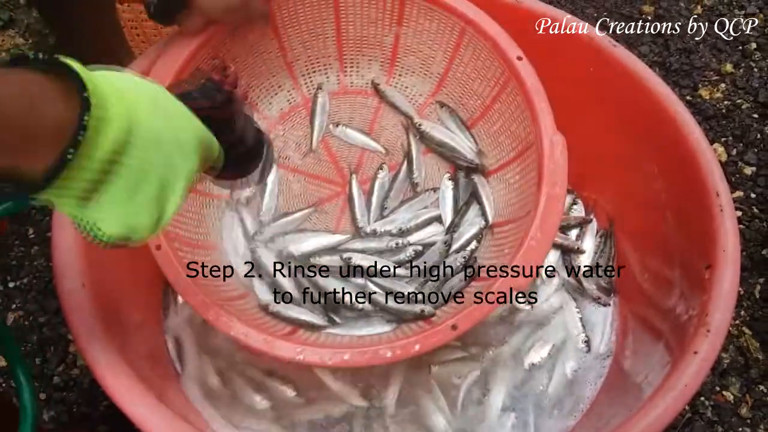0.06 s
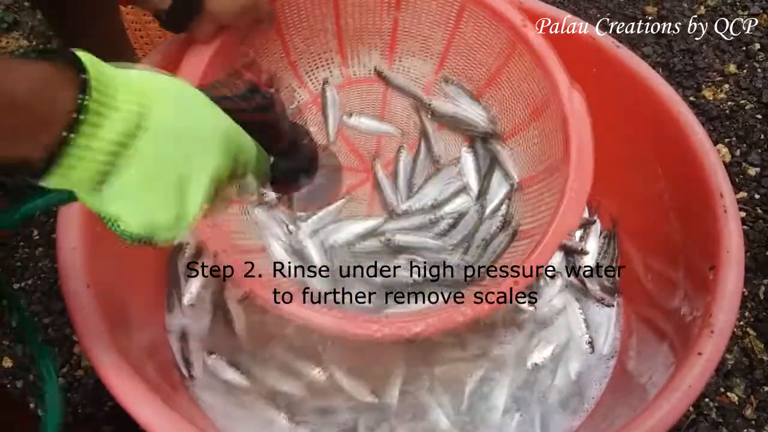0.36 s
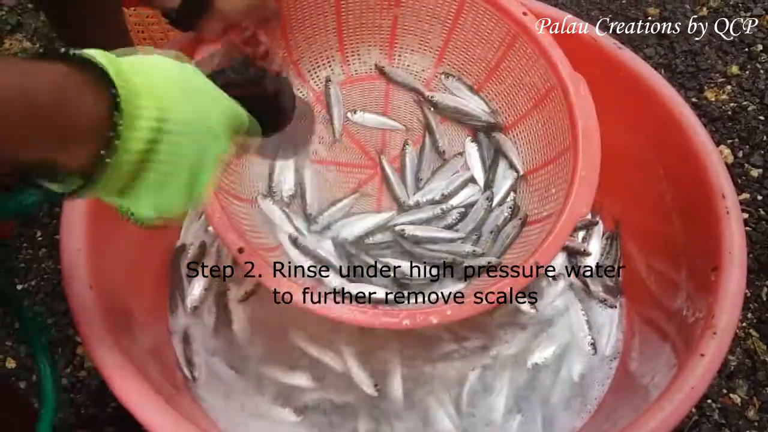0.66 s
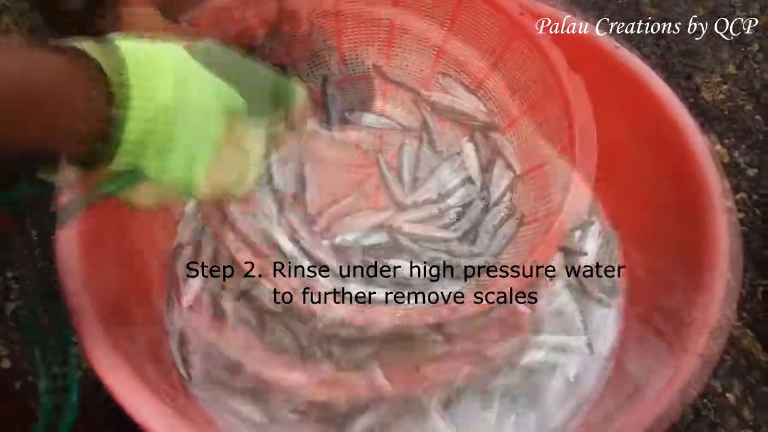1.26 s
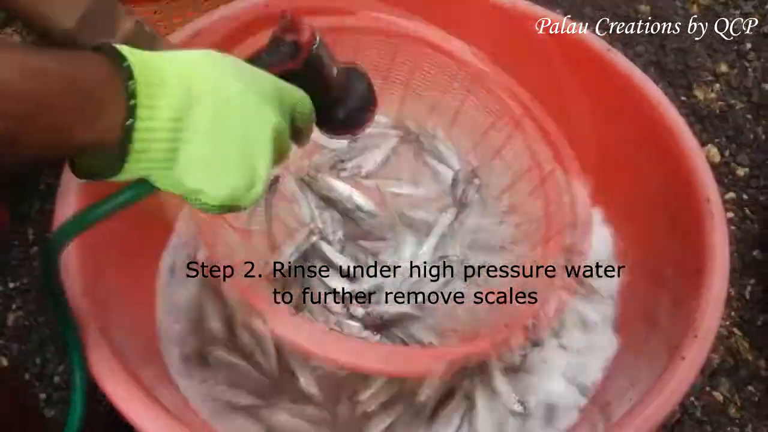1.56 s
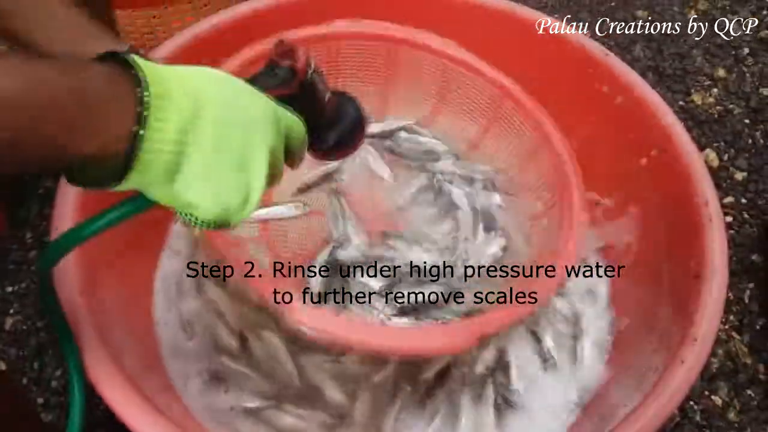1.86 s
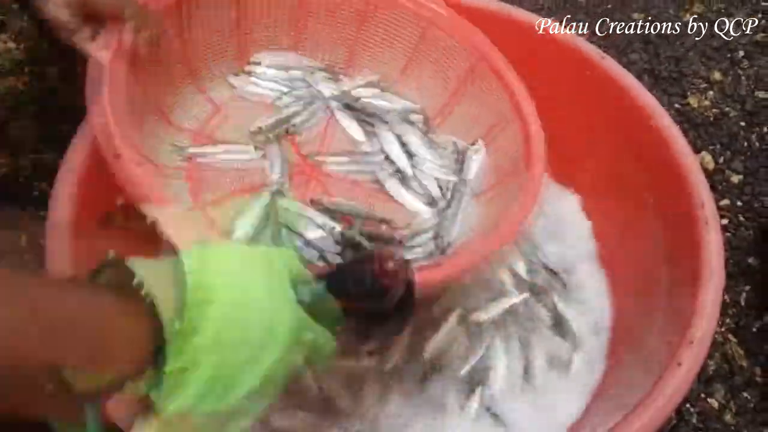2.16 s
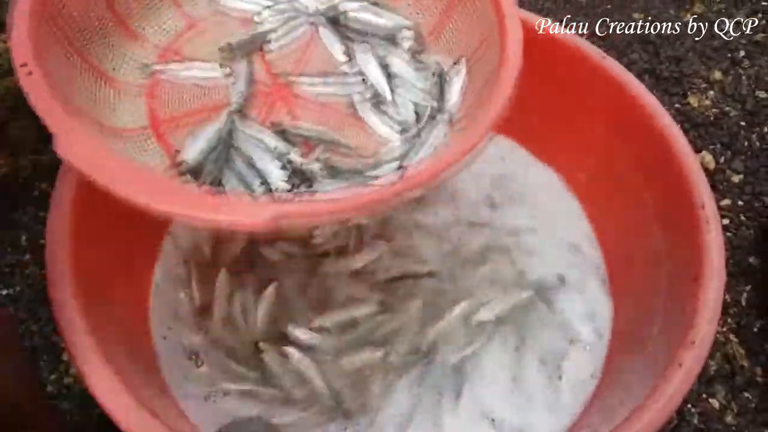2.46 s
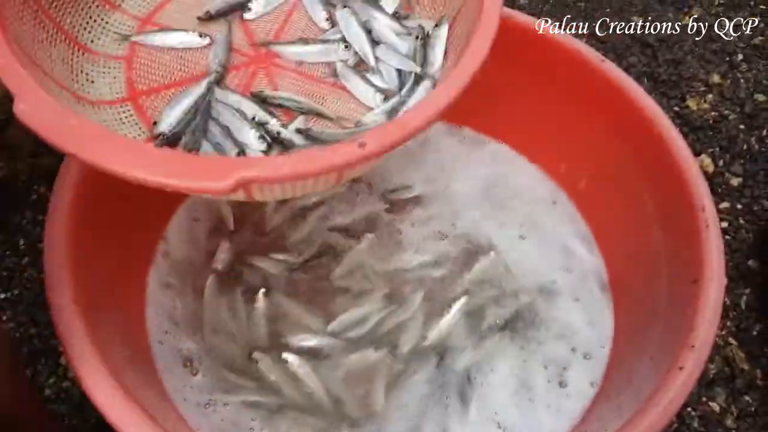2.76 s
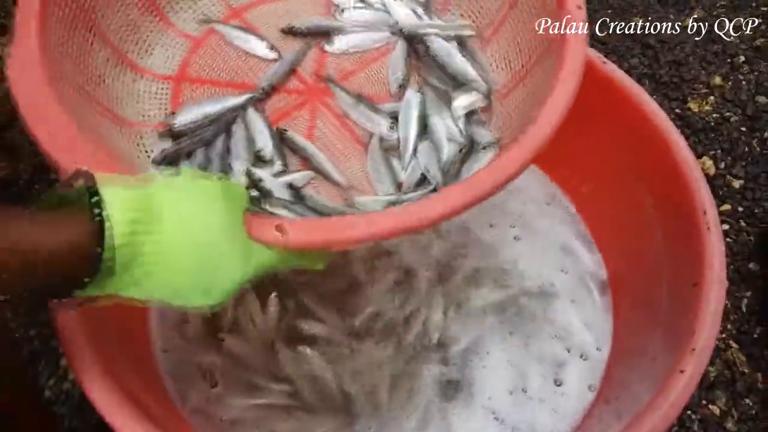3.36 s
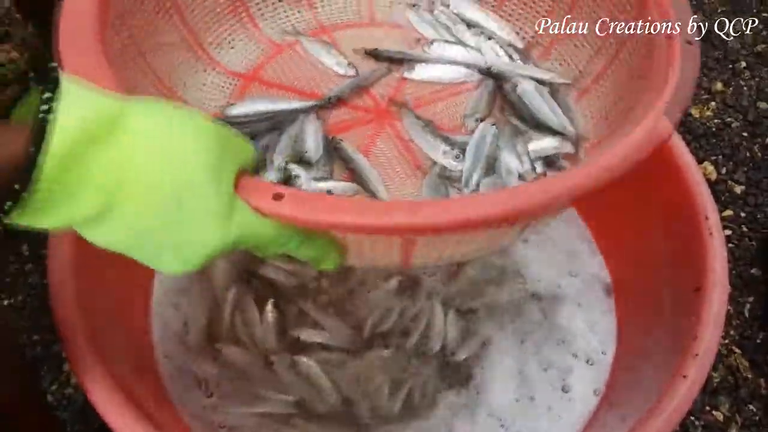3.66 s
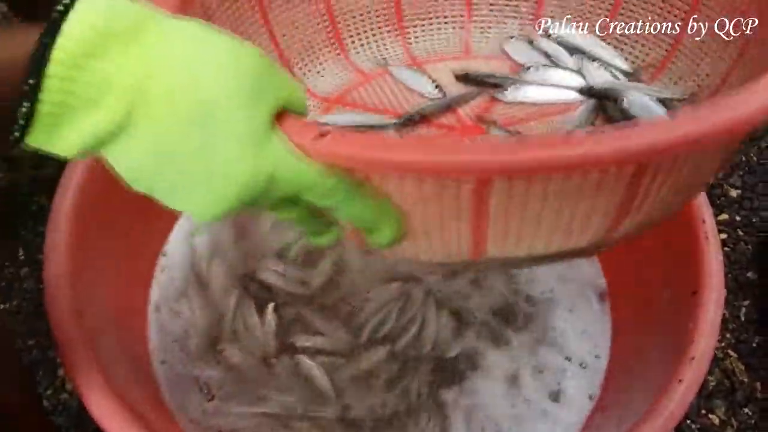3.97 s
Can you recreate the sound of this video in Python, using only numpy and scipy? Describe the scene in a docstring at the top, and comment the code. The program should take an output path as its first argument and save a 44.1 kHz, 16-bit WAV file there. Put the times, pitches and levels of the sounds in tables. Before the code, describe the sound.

A hose sprays hissing water onto small fish in a plastic colander and churns the basin below, close up outdoors. It shuts off, the nozzle knocks and thumps down, and water drips and trickles as a hand swishes through.

```python
"""Outdoors, close to a basin of water, a hose sprays small fish in a plastic colander.
Droplets hiss on the mesh; the jet churns up bubbles and makes the basin drum, then shuts off.
The nozzle knocks once and is dropped with a thump. A gloved hand swishes through the basin
and takes hold of the colander, which trickles and drips into the water.
Each splash traps a bubble of air that rings with a short, rising note."""
import sys
import numpy as np
from scipy import signal
from scipy.fft import rfft, irfft, next_fast_len
from scipy.io import wavfile

SR = 44100
rng = np.random.default_rng(int(sys.argv[2]) if len(sys.argv) > 2 else 0)


def int16_out(signal):
    """Quantize to a 16-bit WAV file."""
    q = np.round(np.clip(np.atleast_2d(signal).T, -1, 1) * 32767)
    wavfile.write(sys.argv[1], SR, q.astype(np.int16))


N = 176400  # 4 s
SHUT_S = 2.078  # the valve starts to close
DROPS_PER_S, DROP_SPREAD_DB = 14000, 2.2


def spray():
    """The jet hits mesh, water and basin until the valve shuts; the falling water dies away more slowly."""
    drops = rms_one(impacts(DROPS_PER_S, DROP_SPREAD_DB))
    mesh, water = mesh_hiss(drops), water_churn()
    sputter_db = .8 * drift(45)
    shut_off_db = -771 * since(SHUT_S)
    falling_water = water * from_db(-23 - 82 * since(SHUT_S))
    return (mesh + water + basin_drum(drops)) * from_db(sputter_db + shut_off_db) + falling_water


# How loud the spray is on the mesh and fish: t/s, relative level/dB
MESH_LOUDNESS = [(0, -28.5), (.12, -28), (.18, -27.5), (.26, -29.5), (.37, -27), (.48, -29.5), (.7, -28.5),
                 (.9, -28.5), (1.02, -26), (1.13, -26.5), (1.3, -29.5), (1.5, -30.5), (1.8, -35.5),
                 (2.05, -35)]
# Its tone, from bass to treble: f/Hz, relative level/dB
MESH_TONE = [(100, -67), (250, -24.5), (430, -17), (650, -23.5), (1300, -20.5), (2000, -11.5), (2600, -5),
             (3200, 1.5), (4050, 0), (4600, -7), (5600, -6), (6700, -13.5), (10500, -11), (13000, -16.5),
             (15800, -29)]


def mesh_hiss(drops):
    """Droplets strike the mesh and the fish, and tiny bubbles fizz."""
    fizz = bubbles(3500, 2200, 6500, cycles=60, spread_db=2.4)
    return from_db(13.5) * level(MESH_LOUDNESS) * with_tone(drops + .7 * fizz, MESH_TONE)


# How loud the jet is on the water: t/s, relative level/dB
CHURN_LOUDNESS = [(0, -42.5), (.5, -41), (.9, -39.5), (1.15, -35.5), (1.36, -30), (1.41, -33.5),
                  (1.46, -29.5), (1.58, -31), (1.7, -32.5), (1.8, -30.5), (1.86, -32), (2.05, -31.5)]
# Tone of the churning: f/Hz, relative level/dB
CHURN_TONE = [(100, -30.5), (250, -22), (430, -13), (720, -18), (1000, -11), (1300, -8.5), (1650, -12.5),
              (2050, -7.5), (2300, -2.5), (2800, 3), (4000, -2.5), (4700, -5), (5700, -1.5), (6700, -31),
              (11000, -83), (16000, -41)]


def water_churn():
    """The jet digs into the water and whips up bigger, lower bubbles."""
    drops = rms_one(impacts(DROPS_PER_S, DROP_SPREAD_DB))
    swarm = bubbles(1600, 700, 4500, cycles=40, spread_db=3.0)
    return from_db(14.5) * level(CHURN_LOUDNESS) * with_tone(drops + .65 * swarm, CHURN_TONE)


# The basin's own notes: f/Hz, level/dB, time to fade by 60 dB/s
BASIN_NOTES = [(251, -61.5, 0.16), (429.2, -44.5, 0.095), (1097, -57, 0.12), (1428, -48.5, 0.13)]


def basin_drum(drops):
    """Droplets set the basin ringing, a little louder as the churning grows."""
    ringing = sum(from_db(db) * rms_one(ring(drops, hz, fade_s)) for hz, db, fade_s in BASIN_NOTES)
    return ringing * rms_one(level(CHURN_LOUDNESS)) ** .26


# Knocks of nozzle and colander: t/s, relative level/dB, treble cut-off f/Hz
KNOCK_HITS = [(2.1922, -16, 2540), (2.1975, -12.5, 550), (2.4655, -12.5, 1210), (2.468, -0.5, 700),
              (2.4703, -6, 545), (2.521, -15, 248), (2.541, -18, 444), (3.619, -21, 1300)]
# The notes they ring: f/Hz, relative level/dB, time to fade by 60 dB/s
KNOCK_NOTES = [(124, -26.5, 0.22), (199, -19, .06), (241, -18.5, 0.124), (438, 0, 0.013),
               (452, -17.5, 0.13), (539, -16.5, 0.053), (700, -24, 0.068), (810, -17, 0.038),
               (1048, -25, 0.085), (1306, -27.5, 0.1), (1820, -9, 0.012), (3100, -5.5, 0.04)]


def knocks():
    """The nozzle knocks, then lands with a thump; the softer the contact, the less treble."""
    taps = np.zeros(N)
    for s, db, contact_hz in KNOCK_HITS:
        click = np.zeros(N) + 1e-18
        click[int(s * SR)] = from_db(db)
        taps += signal.sosfilt(signal.butter(2, contact_hz, fs=SR, output="sos"), click)
    bass_cut = signal.butter(2, 113, "high", fs=SR, output="sos")
    taps = signal.sosfilt(bass_cut, taps + 1e-12 * rng.standard_normal(N))
    return sum(from_db(db) * ring(taps, hz, fade_s) * (-1) ** k
               for k, (hz, db, fade_s) in enumerate(KNOCK_NOTES))


# Splashes: t/s, bubble level/dB, bubble f/Hz, spatter level/dB, spatter length/s
SPLASH_HITS = [(2.543, -27, 2960, -27, 0.0054), (2.593, -17, 2900, -28.5, 0.021),
               (2.626, -28, 3040, -26, 0.0082), (2.651, -27, 2780, -31, 0.012),
               (2.7846, -17.5, 2450, -29, 0.013), (2.824, -17.5, 3010, -29, 0.008),
               (2.849, -32, 3100, -27, 0.0056), (2.8604, -19, 1400, -34, .004),
               (2.862, -7, 2550, -20.5, 0.0049), (2.882, -17, 2900, -21, 0.012),
               (2.9377, -8, 3150, -19.5, 0.0049), (2.985, -20, 3390, -40, .006),
               (2.995, -15, 2770, -24, 0.022), (3.048, -22, 3390, -29, 0.014),
               (3.0675, -12.5, 2850, -32, 0.0055), (3.107, -17.5, 2600, -30, 0.018),
               (3.1384, -18, 3130, -26.5, 0.0058), (3.153, -7, 2720, -21, 0.0032),
               (3.2284, -22, 3610, -26.5, 0.0059), (3.314, -23, 3570, -32, 0.0062),
               (3.331, -30, 3300, -29.5, 0.02), (3.3918, -29, 2410, -41, .004),
               (3.4, -29, 2600, -32.5, .006), (3.4665, -22, 4030, -30.5, 0.0077),
               (3.525, -32, 1580, -35, .004), (3.5295, -15.5, 3100, -35, 0.0056),
               (3.6154, -29.5, 896, -54, .01), (3.6666, -15, 2660, -24.5, 0.0076),
               (3.684, -12.5, 2950, -25, 0.0066), (3.699, -20, 3800, -26, 0.016),
               (3.7677, -13.5, 3500, -40, .008), (3.866, -34, 945, -44, .008),
               (3.8745, -26, 3260, -36, .01), (3.9064, -20, 3500, -36, 0.0073)]
# Tone of the spatter: f/Hz, relative level/dB
SPATTER_TONE = [(300, -14.5), (1000, -11), (1800, -14), (2700, 5.5), (3600, 2.5), (4600, -6), (5600, -7),
                (6600, -23.5), (10000, -26.5), (15800, -37)]


def splashes():
    """Each splash spatters droplets and traps a bubble that swells, rings and rises in pitch."""
    length_s, swell_s, fade_cycles, rise_per_s = .12, .00067, 12, 11.4
    plinks, spatter = np.zeros(N), np.zeros(N)
    wobble = .04 * drift(400)  # share of the pitch
    for s, db, hz, spatter_db, spatter_s in SPLASH_HITS:
        span = np.arange(int(s * SR), min(int((s + length_s) * SR), N))
        t = (span - span[0]) / SR
        pitch_hz = hz * (1 + rise_per_s * np.minimum(t, .02) + wobble[span])
        shape = (1 - np.exp(-(t / swell_s) ** 2)) * np.exp(-t * hz / fade_cycles)
        plinks[span] += from_db(db) * shape / shape.max() * np.sin(2 * np.pi * np.cumsum(pitch_hz) / SR)
        spatter += from_db(spatter_db) * burst(s, spatter_s, rise_s=.0016, fall_s=.0051)
    return plinks + spatter * with_tone(impacts(DROPS_PER_S, DROP_SPREAD_DB), SPATTER_TONE)


# Strokes of the hand through the water: t/s, length/s, level/dB
HAND_STROKES = [(2.639, 0.017, -33), (2.714, 0.04, -33.5), (2.787, 0.022, -35.5), (2.857, 0.013, -22.5),
                (2.884, .02, -38), (2.933, 0.029, -35), (2.978, 0.061, -31), (3.095, 0.019, -37),
                (3.169, 0.057, -37.5), (3.259, 0.013, -38.5), (3.618, 0.023, -35), (3.746, 0.028, -36.5),
                (3.856, 0.053, -38.5), (3.926, 0.098, -44.5)]
# Tone of the sloshing: f/Hz, relative level/dB
SLOSH_TONE = [(60, -8), (200, 0), (480, 1.5), (750, -3), (1400, -3), (2200, -3), (4000, 0.5), (12000, -30)]


def sloshes():
    """Each stroke of the hand stirs up droplets and a short swarm of large bubbles."""
    swarm = bubbles(1500, 390.5, 2320, cycles=29, spread_db=5.0)
    drops = rms_one(impacts(4000, spread_db=3.0))
    strokes = sum(from_db(db) * burst(s, length_s, rise_s=.0018, fall_s=.018)
                  for s, length_s, db in HAND_STROKES)
    return with_tone(swarm + 1.64 * drops, SLOSH_TONE) * strokes


# How loud the water runs off the colander: t/s, level/dB
TRICKLE_LOUDNESS = [(2.08, -39), (2.17, -39), (2.3, -56), (2.45, -48.5), (2.53, -39.5), (2.6, -31.5),
                    (2.7, -33), (2.85, -32.5), (3.02, -30.5), (3.2, -38), (3.34, -35.5), (3.44, -39.5),
                    (3.6, -46.5), (3.7, -31), (3.81, -43), (3.9, -35), (4, -41.5)]
# Tone of the trickle: f/Hz, relative level/dB
TRICKLE_TONE = [(300, 3), (1000, -17.5), (1900, -12), (2300, -7), (2700, 1), (3600, 0.5), (4600, -8.5),
                (5600, -9), (6600, -23.5), (10000, -15.5), (15800, -36)]


def trickle():
    """Once the hose is off, water runs from the colander and makes clumps of small bubbles."""
    swarm = bubbles(1400, 970, 6600, cycles=30, spread_db=3.0)
    wash = .55 * rng.standard_normal(N)
    flow = level(TRICKLE_LOUDNESS) * from_db(1.5 * drift(45)) * (since(SHUT_S) > 0)
    return flow * with_tone(swarm + wash, TRICKLE_TONE)


# Single drops landing: t/s, relative level/dB, f/Hz
DROP_TICKS = [(2.199, -19.5, 3700), (2.392, -32, 3760), (2.547, -20.5, 5770), (2.883, -22, 7840),
              (3.094, -25, 6100), (3.667, -21, 10000), (3.7597, -18, 5000), (3.767, -25, 8300),
              (3.8324, -22, 10100), (3.887, -28, 7650), (3.904, -29, 9500), (3.91, -19, 5170)]


def ticks():
    """Drops snap on plastic and water with a very short, bright ring."""
    noise, out, fade_s = rng.standard_normal(N), np.zeros(N), .0011
    for s, db, hz in DROP_TICKS:
        snap = rms_one(ring(ring(noise, hz, fade_s), hz, fade_s))
        out += from_db(db) * snap * burst(s, 0, rise_s=.00064, fall_s=.0017)
    return out


# Tone of the finest drops: f/Hz, relative level/dB
PATTER_TONE = [(2000, -7), (5000, -19), (8000, -3), (10500, -8), (12500, -6), (15800, -31)]


def patter():
    """From the first splash on, tiny drops make faint, very high bubbles."""
    tiny = bubbles(440, 6300, 12100, cycles=20, spread_db=4.2)
    return from_db(-54.5) * with_tone(tiny, PATTER_TONE) * (since(SPLASH_HITS[0][0]) > 0)


# One bump of handling: t/s, length/s, level/dB
HANDLING_BUMP = (3.38, 0.095, -43)
# Its dull tone: f/Hz, relative level/dB
BUMP_TONE = [(25, -17), (50, -1.5), (150, -6.5), (300, -10.5), (1000, -39)]


def bump():
    """Handling makes one soft, low bump."""
    s, length_s, db = HANDLING_BUMP
    rumble = with_tone(rng.standard_normal(N), BUMP_TONE)
    return from_db(db) * burst(s, length_s, rise_s=.0072, fall_s=.1) * rumble


def echoes(x, fade_s=.2):
    """Sound bounces briefly off the basin and the ground."""
    t = np.arange(SR // 2) / SR
    tail = rng.standard_normal(len(t)) * np.exp(-np.log(1000) * t / fade_s) * (t > .003)
    return from_db(-17) * signal.fftconvolve(x, tail / np.linalg.norm(tail))[:N]


# Tone of the background: f/Hz, relative level/dB
AIR_TONE = [(15, -41), (25, -37), (43, -8), (96, -7.5), (281, -17), (445, -12.5), (1850, -19),
            (3340, -14.5), (5580, -25), (6730, -34), (15500, -35)]


def air():
    """Steady outdoor air, with the faint fizz of foam in the basin."""
    return from_db(-47) * with_tone(rng.standard_normal(N), AIR_TONE)


def from_db(db):
    """Turn decibels into a number to multiply by."""
    return 10 ** (np.asarray(db) / 20)


def rms_one(x):
    """Scale a signal to an average strength (rms) of 1."""
    return x / np.sqrt(np.mean(x ** 2) + 1e-20)


def since(s):
    """Seconds since a moment, zero before it."""
    return np.maximum(np.arange(N) / SR - s, 0)


def level(rows):
    """A volume curve through rows of t/s, level/dB."""
    return from_db(np.interp(since(0), *np.transpose(rows)))


def drift(hz):
    """A smooth random wander of about 1 either way; higher hz wanders faster."""
    r = np.exp(-80 * np.pi * hz / SR)  # one step every 40 samples
    slow = signal.lfilter([1], [1, -2 * r, r * r], rng.standard_normal(N // 40 + 2002))[2000:]
    return np.interp(np.arange(N) / 40, np.arange(len(slow)), rms_one(slow))


def with_tone(x, tone):
    """Shape bass and treble along rows of f/Hz, level/dB; the result has strength 1."""
    size = next_fast_len(N + SR // 2) // 2 * 2
    hz, db = np.transpose(tone)
    log_hz = np.log(np.maximum(np.arange(size // 2 + 1) * SR / size, 1))
    bass_cut_db = 10 * np.minimum(log_hz - np.log(hz[0]), 0)
    gain = from_db(np.interp(log_hz, np.log(hz), db) + bass_cut_db)
    # A minimum-phase filter: nothing rings before the click that starts it.
    cepstrum = irfft(np.log(gain))
    response = np.exp(rfft(2 * cepstrum[:size // 2], size))
    return rms_one(irfft(rfft(x, size) * response)[:N])


def impacts(per_s, spread_db):
    """Random droplet clicks, many small and a few large."""
    sizes = from_db(spread_db * np.minimum(rng.exponential(1, N), 4)) * rng.choice([-1, 1], N)
    return sizes * (rng.random(N) < per_s / SR)


def ring(clicks, hz, fade_s):
    """Each click starts a pure note that falls by 60 dB in fade_s."""
    r, w = from_db(-60 / (fade_s * SR)), 2 * np.pi * hz / SR
    return signal.lfilter([0, np.sin(w)], [1, -2 * r * np.cos(w), r * r], clicks + 1e-18)


def bubbles(per_s, low_hz, high_hz, cycles, spread_db, pitches=32):
    """A swarm of bubbles that each swell quickly and ring for about `cycles` vibrations."""
    clicks, pitch_choice = impacts(per_s, spread_db), rng.integers(0, pitches, N)
    swarm = np.zeros(N)
    for k, hz in enumerate(np.geomspace(low_hz, high_hz, pitches)):
        notes = ring(clicks * (pitch_choice == k), hz, cycles / hz)
        swarm += hz ** 2 * ring(notes, hz, 6 / hz)  # soften each start; even out low and high
    return rms_one(swarm)


def burst(s, length_s, rise_s, fall_s):
    """A volume curve that rises at time s, holds, then dies away."""
    out, start = np.zeros(N), int(s * SR)
    t = np.arange(min(N - start, int((length_s + 10 * fall_s) * SR))) / SR
    out[start:start + len(t)] = (1 - np.exp(-t / rise_s)) * np.exp(-np.maximum(t - length_s, 0) / fall_s)
    return out


def scene():
    """All the sounds together, the same on the left and right."""
    hits = sloshes() + splashes() + ticks() + knocks()
    mono = spray() + trickle() + patter() + hits + echoes(hits) + bump() + air()
    return np.array([mono, mono])


def record(dry):
    """Peaks stop at full scale and the highest treble is cut."""
    treble_cut = signal.ellip(12, .1, 80, 15800, fs=SR, output="sos")
    return signal.sosfilt(treble_cut, np.clip(dry, -1, 1))


dry = scene()
out = record(dry)
int16_out(out)
```